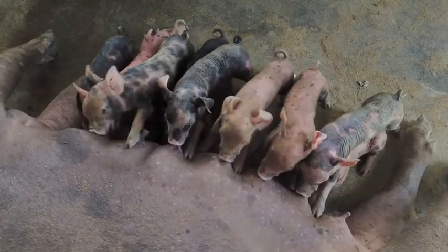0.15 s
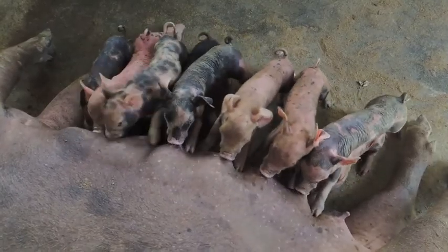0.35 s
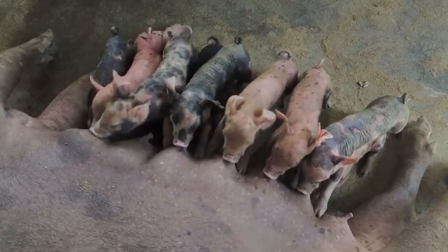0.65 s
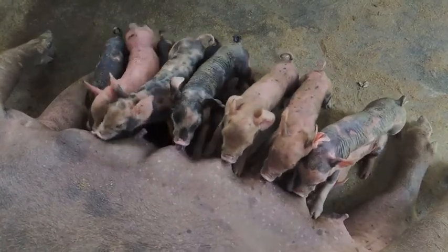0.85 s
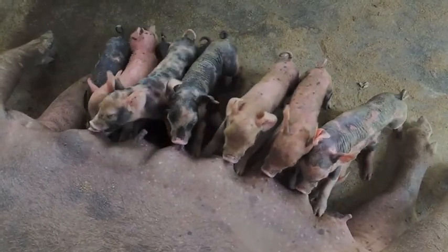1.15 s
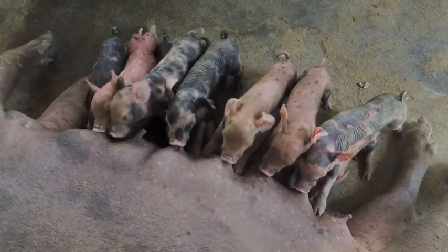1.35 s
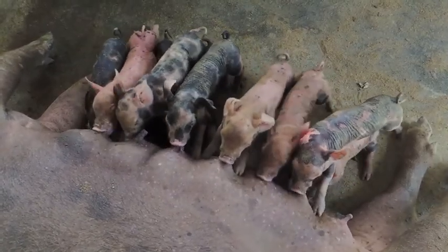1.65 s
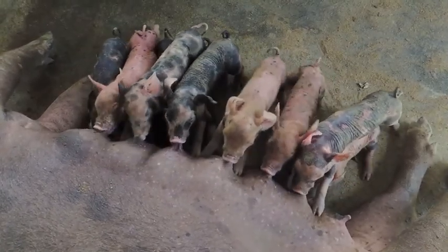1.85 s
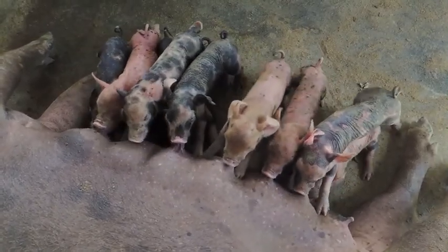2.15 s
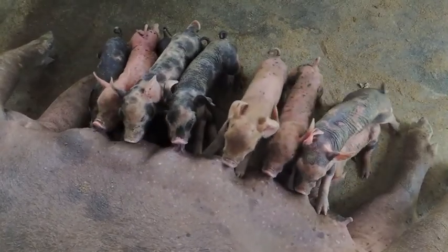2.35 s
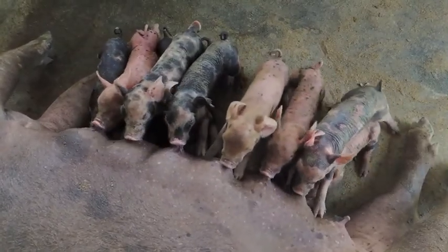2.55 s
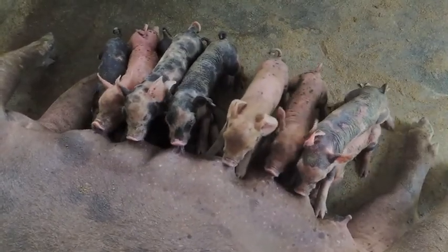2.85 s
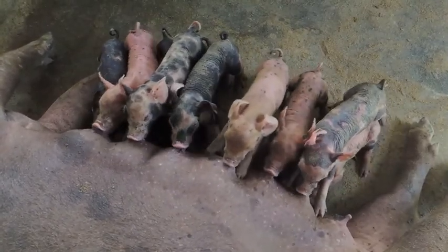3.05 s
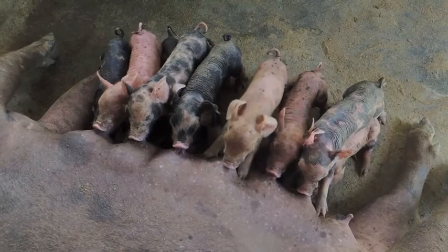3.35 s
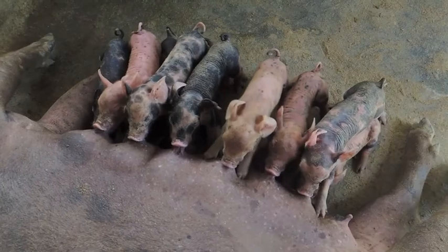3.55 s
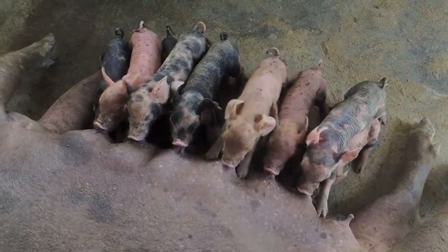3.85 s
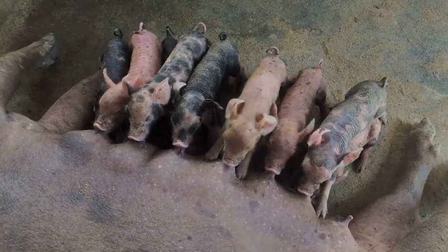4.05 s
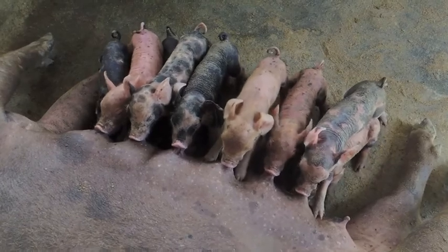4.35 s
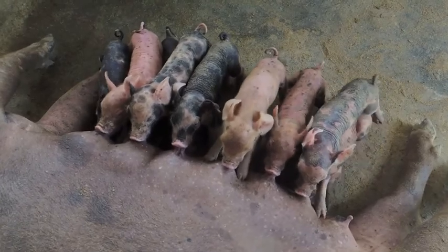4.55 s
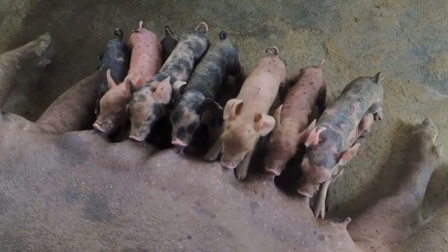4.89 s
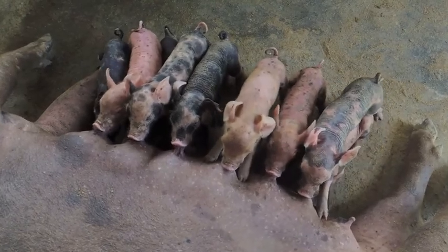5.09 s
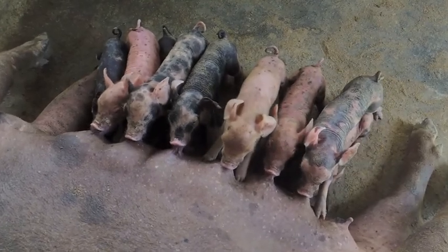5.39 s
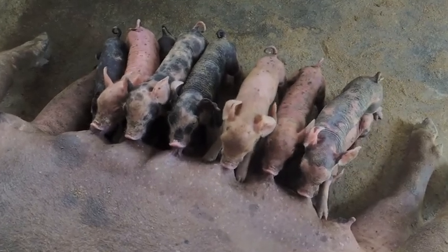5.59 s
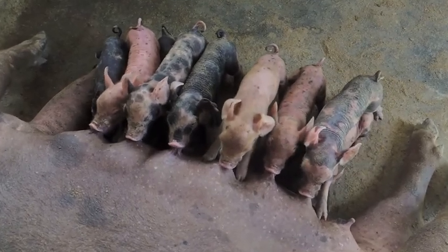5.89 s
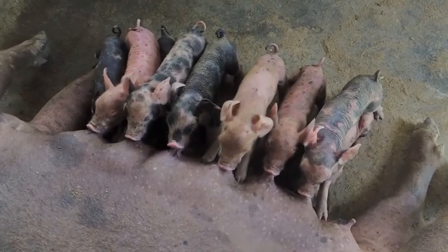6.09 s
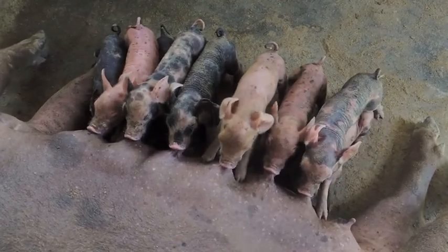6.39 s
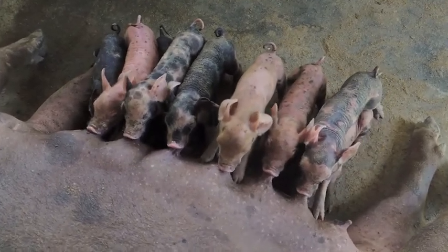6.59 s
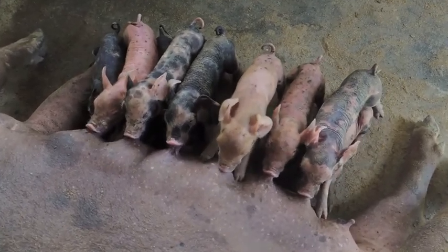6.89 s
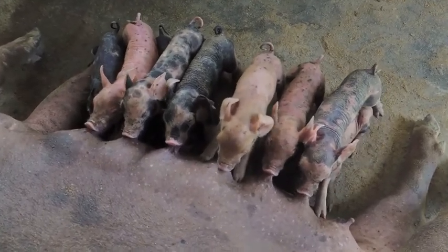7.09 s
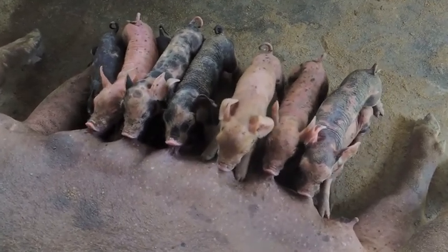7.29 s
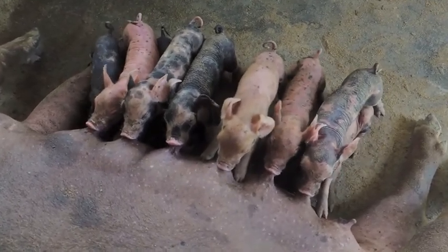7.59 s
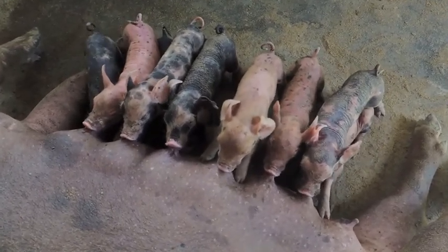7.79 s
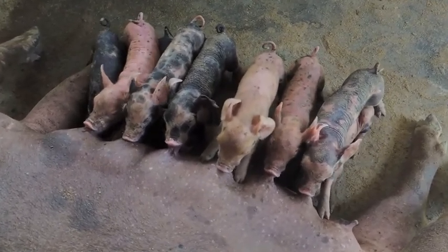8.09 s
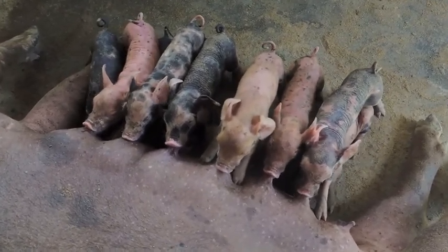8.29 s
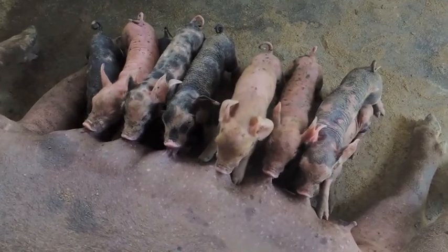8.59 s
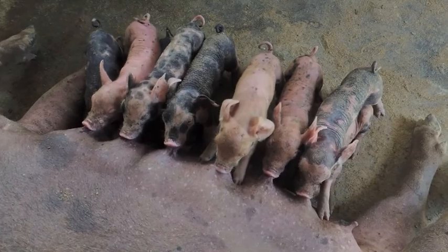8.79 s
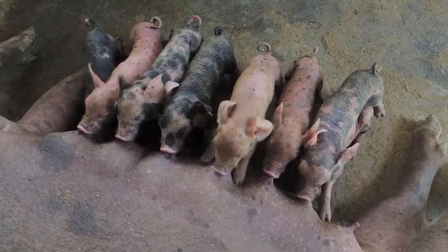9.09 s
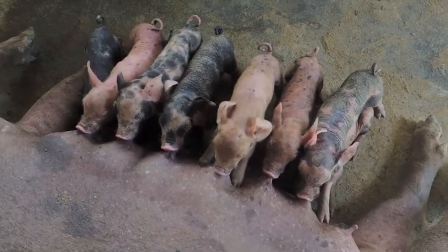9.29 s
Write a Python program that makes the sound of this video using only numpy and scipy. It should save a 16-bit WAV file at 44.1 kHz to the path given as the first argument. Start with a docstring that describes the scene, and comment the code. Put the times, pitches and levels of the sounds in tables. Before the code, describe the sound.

A sow gives short, low, rattling grunts in steady rhythm while piglets suckle with wet smacks and pops; one brief hoarse squeal early on.

```python
"""A sow on a concrete floor grunts in a steady rhythm, each grunt a few slow flaps ringing her throat. Her
piglets suckle: spit noise crackles into wet smacks, and tongues click sharply in mouths as click and ring.
Pulses through a few resonances make their whines and two breathy tails of the sow's grunts; a chopped, hoarse
whistle makes one squeal. Behind them lie faint wet ticks at random, the echo of floor and walls, and the dull
noise of the sty's air with a far insect hiss, a narrow band of noise."""
import sys
import numpy as np
from scipy import signal
from scipy.fft import rfft, irfft
from scipy.io import wavfile
from scipy.ndimage import uniform_filter1d

SR = 44100
rng = np.random.default_rng(int(sys.argv[2]) if len(sys.argv) > 2 else 0)


def digitize_waveform(pressure):
    """Quantize a signal to 16-bit integers and store it at the path in sys.argv[1].

    Rows of a 2-D input are taken as channels; values are limited to [-1, 1].
    """
    field = np.atleast_2d(pressure).T
    bounded = np.clip(field, -1, 1)
    quanta = np.round(bounded * 32767).astype(np.int16)
    wavfile.write(sys.argv[1], SR, quanta)


def voltage_ratio(level):
    """Linear amplitude factor for a level in decibels (scalar or array-like)."""
    return 10 ** (np.asarray(level, float) / 20)


N = 416304

# modes of the sow's throat and snout: f/Hz, t60/s, then relative level/dB at the first flap,
# in mid-grunt and at the last flap
THROAT_MODES = [(84, 0.033, 4, -10.5, 0.5), (161, 0.087, -3.5, -6, 0), (227, 0.03, -2, 1, -1.5),
                (418.1, 0.08, 3.5, 2.5, 2.5), (567, 0.038, -8, -0.5, -4.5), (637, 0.054, -10.5, -5.5, -7.5),
                (1036, 0.044, -1.5, -2.5, -3.5), (1473, 0.076, -10, 1, -36), (1819, 0.033, 3.5, -9, 6),
                (2228, 0.015, -3, -80, -62), (2394, 0.029, -6.5, 3.5, -36), (2776, 0.051, -10, -1, -19),
                (3250, 0.047, -8, -1.5, -14.5), (3610, 0.051, -9, -16, -3), (4314, 0.027, -18, -9, -2.5),
                (4820, 0.022, -9.5, -65, -20), (5213, 0.079, -10.5, -56, -37)]
OPENING = 260  # samples from the start of a flap's bulge to its slap


def evened(x):
    """Scales to rms 1."""
    return x / np.sqrt(np.mean(x ** 2) + 1e-20)


def read(points, hz):
    """Reads a table on a log-frequency axis."""
    f, value = np.transpose(points)
    return np.interp(np.log(hz + 1), np.log(f + 1), value)


def add(mix, s, sound):
    """Mixes a sound in at time s."""
    part = mix[..., round(s * SR):][..., :sound.shape[-1]]
    part += sound[..., :part.shape[-1]]


def resonate(x, hz, width_hz):
    """A fixed resonance of gain 1 at its peak."""
    return signal.lfilter(*signal.iirpeak(hz, hz / width_hz, SR), x)


def coloured(x, points):
    """Gives white noise the spectrum of a table, at rms 1."""
    hz = np.fft.rfftfreq(x.shape[-1], 1 / SR)
    return evened(irfft(rfft(x) * voltage_ratio(read(points, hz)), x.shape[-1]))


def flap(place, bright_db, chance):
    """One flap rings all modes of the throat; their balance shifts with its place in the grunt (0-1)."""
    t, ring = np.arange(6000) / SR, 0
    for k, ((hz, t60, *db), (detune, lift)) in enumerate(zip(THROAT_MODES, chance)):
        mode_db = np.interp(place, [0, .5, 1], db) + 2 * lift + bright_db * (hz > 1300)
        tone = np.sin(2 * np.pi * hz * (1 + 0.026 * detune) * t)
        ring = ring + (-1) ** k * voltage_ratio(mode_db - 60 * t / t60) * tone  # neighbours have opposite sign
    after = np.arange(4000)
    rush = np.exp(-after / 300) + voltage_ratio(-9) * np.exp(-after / 1500)  # air rushes out, breath lingers
    air = rng.standard_normal((2, 4000)) * rush
    thinned = air[0] - 0.46 * uniform_filter1d(air[0], 30)  # turbulence is thin in the bass
    strike = 0.87 * thinned / np.sqrt(300)
    slap = np.hanning(round(np.interp(place, [0, 1], [5, 22])) + 2)  # tiring flaps close more softly
    add(strike, 0, -slap / slap.sum())
    bulge = np.hanning(OPENING)  # the tissue bulges slowly before it slaps shut
    sound = signal.fftconvolve(ring, np.append(0.5 * bulge / bulge.sum(), strike))
    rasp = resonate(resonate(air[1], 4200, 1470), 4200, 1470)  # breath scrapes broadly past the palate
    add(sound, OPENING / SR, voltage_ratio(bright_db - 2) * rasp)
    return sound


def sow():
    """A soft dull catch, then slow flaps that swell, sink and grow duller, over a sigh of breath."""
    # grunts: first full flap t/s, last flap t/s, number of flaps
    grunts = [(.432, .543, 5), (.876, .958, 4), (1.543, 1.655, 5), (2.048, 2.13, 4), (2.51, 2.594, 4),
              (3.162, 3.248, 4), (3.714, 3.795, 4), (4.363, 4.448, 4), (4.928, 5.001, 4), (5.465, 5.556, 4),
              (5.985, 6.074, 4), (6.637, 6.742, 5), (7.132, 7.217, 4), (7.655, 7.747, 5), (8.309, 8.394, 4),
              (8.939, 9.025, 4)]
    # each grunt's effort: level/dB, first flap relative to the peak/dB, place of the peak (0-1),
    # brightness after the first flap/dB
    effort = [(-20, -11, 0.75, 4), (-19, -13.5, 0.44, -4.5), (-21.5, -5.5, 0.17, -7),
              (-17.5, -21, 0.38, -1.5), (-18.5, -9.5, 0.96, -5), (-22.5, -7, .66, 0),
              (-20.5, -8.5, 0.59, -1.5), (-22, -6, 0.45, 2), (-22, -7, 0.7, 2.5), (-19.5, -12, 0.9, 1.5),
              (-22, -11.5, .66, 5.5), (-22, -9, 0.85, 4.5), (-21.5, -7.5, 1, -2.5), (-22.5, -7, .7, -1.5),
              (-22.5, -6.5, 0.7, 3), (-23, -8.5, 0.47, -3)]
    catch_s, catch_db = .038, -39.5  # lead of the catch; its gain
    last_db, dulling_db = -5.5, -9.5  # last flap under the peak; treble change reached by the last flap
    sigh_db, sigh_t60 = -24.5, 0.24  # sigh under the effort; its decay in s
    out, t = np.zeros(N), np.arange(20000) / SR
    for (s, last_s, count), (effort_db, first_db, peak, bright_db) in zip(grunts, effort):
        chance = rng.standard_normal((6, len(THROAT_MODES), 2))
        catch = flap(1, -28, chance[-1])
        add(out, s - catch_s - OPENING / SR, voltage_ratio(catch_db) * catch)
        length = last_s - s
        breath = evened(resonate(rng.standard_normal(len(t)), 1020, 2800))
        fade_db = -60 * np.maximum(t - length, 0) / sigh_t60
        # breath builds through the grunt and sighs out after it
        add(out, s, breath * np.minimum(t / length, 1) * voltage_ratio(effort_db + sigh_db + fade_db))
        for k in range(count):
            place = k / (count - 1)
            sound = flap(place, (k > 0) * (bright_db + dulling_db * place), chance[k])
            swell_db = np.interp(place, [0, min(peak, .95), 1], [first_db, 0, last_db])
            add(out, s + place * length - OPENING / SR, voltage_ratio(effort_db + swell_db) * sound)
    # keeps the grunts free of rumble below 70 Hz
    return signal.sosfilt(signal.butter(2, 70, "high", fs=SR, output="sos"), out)


def smacks():
    """Spit at the teats crackles up to one loud tick and fizzes away, a bright part over a dull one."""
    # smacks: loud tick t/s, bright part level/dB, dull part level/dB, both before the envelope
    moments = [(0.0644, -37, -40), (0.133, -42, -58), (0.399, -41, -51), (.6075, -30, -65),
               (0.9317, -38, -57), (1.047, -38, -47), (1.5107, -28, -54), (1.752, -35, -63),
               (1.96, -35, -65), (2.1902, -31, -60), (2.258, -42, -48), (2.353, -43, -48.5),
               (2.436, -31.5, -54), (2.664, -33.5, -52), (2.903, -34.5, -61), (3.15, -36.5, -47.5),
               (3.395, -34.5, -66), (3.645, -35, -50), (3.89, -44, -58), (4.14, -46, -50),
               (4.3744, -35, -47), (4.6307, -38, -53), (4.876, -38, -68), (5.1203, -33, -70),
               (5.361, -36, -57), (5.528, -43.5, -39.5), (5.624, -37, -61), (5.8495, -38, -50),
               (6.054, -41, -38), (6.109, -32.5, -56), (6.249, -42, -51.5), (6.366, -35, -56),
               (6.433, -45, -53), (6.6104, -34, -45), (6.846, -35, -52), (7.1078, -34.5, -52),
               (7.1916, -37, -44), (7.263, -46, -57), (7.35, -66, -47), (0.858, -51, -48),
               (7.5625, -33, -49), (7.8294, -39, -59), (7.9196, -36, -45), (8.069, -37, -51),
               (8.316, -39, -43), (8.577, -37, -58), (8.842, -33, -46), (8.916, -44, -60),
               (9.0818, -45, -62), (9.315, -42, -68)]
    # spectrum of the bright part: f/Hz, relative level/dB per Hz
    spectrum = [(3530, -53), (6000, -9.5), (6970, -11.5), (8380, -3), (9430, -2), (12200, 3), (14100, -11),
                (15000, -48)]
    out, t = np.zeros((2, N)), np.arange(-900, 3500) / SR
    crackle = .6 * np.clip(2 + 2 * t / 0.011, 0, 1)  # begins 11 ms ahead of the tick
    fizz = .5 * voltage_ratio(-60 * t / .15) + voltage_ratio(-60 * abs(t) / .016)  # slow fizz plus the short tick
    shape = np.where(t < 0, crackle, fizz)
    for s, bright_db, dull_db in moments:
        left, other, dull, draw, size = rng.standard_normal((5, len(t)))
        bright = np.array([left, 1.2 * left + 0.6 * other])  # short waves differ from left to right
        bubbles = (draw > 2.4) * (0.14 + abs(size))
        grain = np.convolve(bubbles, np.hanning(50), "same") + 0.75
        ring_hz = 12400 * (1 + 0.11 * rng.standard_normal())
        hollow = bright + 1.6 * resonate(bright, ring_hz, 1800)  # the gap between lip and teat rings
        spit = voltage_ratio(bright_db) * coloured(hollow, spectrum)
        spit = spit + voltage_ratio(dull_db) * evened(resonate(dull, 3640, 4000))
        add(out, s + t[0], spit * grain * shape)
    return out


def pops():
    """A tongue clicks in a mouth: a sharp click, two short rings of the mouth and a fizz."""
    # pops: t/s, level/dB, low ring f/Hz, high ring f/Hz, t60 of the driving noise/s
    moments = [(1.09, -12, 2780, 13300, 0.036), (2.0249, -21, 4470, 10000, 0.034),
               (3.056, -31, 1100, 10600, 0.063), (5.2987, -28.5, 3580, 13500, 0.035),
               (5.825, -33.5, 3460, 10200, 0.054), (5.885, -29.5, 1040, 7460, 0.02),
               (6.56, -31, 1130, 12200, 0.038), (7.0203, -25, 990, 11100, 0.12),
               (8.6612, -22.5, 1340, 6540, 0.091)]
    out, t = np.zeros(N), np.arange(3000) / SR
    for s, level_db, low_hz, high_hz, t60 in moments:
        burst = rng.standard_normal(len(t)) * voltage_ratio(-60 * t / t60)
        click = np.sin(2 * np.pi * 5000 * t) * np.exp(-t / 0.000089)
        rings = 1.2 * resonate(burst, low_hz, 330) + 1.36 * resonate(burst, high_hz, 1170)
        add(out, s, voltage_ratio(level_db) * (click + rings + 0.26 * burst))
    return out


def voiced(length, db, hz, bright_db):
    """Unsteady pulses and breath noise drive the resonances of a snout."""
    # resonances of a piglet's snout, used for every call: f/Hz, width/Hz, relative level/dB
    snout = [(607, 570, 25.5), (1700, 480, 11.5), (3430, 740, 7), (6640, 2400, 3)]
    size = round(length * SR)
    wobble = 1 + .6 * uniform_filter1d(rng.standard_normal(8000), 90)[:size]
    climb = 1 + .12 * np.linspace(-.5, .5, size)  # the pitch rises through the call
    turns = np.cumsum(hz * climb * wobble) / SR
    pulses = np.diff(np.floor(turns), prepend=0)
    drive = evened(pulses) + .35 * rng.standard_normal(8000)[:size]
    voice = 0
    for f, width, gain_db in snout:
        formant = resonate(resonate(drive, f, width), f, width)
        voice = voice + voltage_ratio(gain_db + bright_db * (f > 1000)) * formant
    return voltage_ratio(db) * evened(voice) * np.sqrt(np.hanning(size))


def whines_and_tails():
    """Short whines of the piglets, and two breathy tails of the sow's grunts at 1.659 and 5.022 s."""
    # calls: t/s, length/s, level before the fades/dB, mid pitch f/Hz, brightness above 1 kHz/dB
    calls = [(0.186, 0.1, -45, 560, 4), (0.297, .04, -31.5, 1720, 7.5), (0.71, 0.037, -40.5, 599, 6),
             (0.928, .1, -38.5, 81.4, 16), (0.973, .056, -33, 3900, 32), (1.192, 0.15, -39, 458, 8),
             (1.659, 0.082, -38, 291.5, 9), (1.735, 0.04, -35, 600, 41), (2.716, 0.18, -44, 213, 6),
             (2.795, 0.047, -42.5, 750, 9), (4.786, 0.075, -47.5, 663, -20),
             (5.022, 0.053, -36.5, 288, -16), (6.195, 0.079, -49, 1126, -15), (6.518, .07, -51, 690, -16),
             (7.44, .17, -54, 1310, -13)]
    out = np.zeros(N)
    for s, *call in calls:
        add(out, s, voiced(*call))
    return out


def squeal():
    """An arching whistle with overtones; a slower vibration chops it and breath makes it hoarse."""
    # course of the squeal: t/s, relative level/dB, pitch f/Hz, roughness (0-1), share of the octave (0-1)
    course = [(1.235, -32, 2255, 0.1, 0), (1.248, -37, 2800, 0.5, 0.88), (1.272, -19.5, 3250, 0.72, 0.85),
              (1.294, -20, 3480, 0.64, 0.8), (1.306, -20.5, 3700, 0.25, 0.52),
              (1.332, -29, 3840, 0.14, 0.6), (1.359, -24, 3680, 0.02, 0.4), (1.379, -27, 3300, 0, 0.74),
              (1.396, -48, 1740, 0.2, 0)]
    s, *columns = np.transpose(course)
    t = np.arange(s[0], s[-1], 1 / SR)
    db, hz, rough, octave = (np.interp(t, s, np.array(c)) for c in columns)
    shake = evened(uniform_filter1d(rng.standard_normal(9000), 40))[:len(t)]
    turn = 2 * np.pi * np.cumsum(hz * (1 + (.012 + .08 * rough) * shake)) / SR
    upper = rough * (.2 * np.sin(3 * turn) + .45 * np.sin(4 * turn))
    tone = (1 - octave) * np.sin(turn) + octave * (np.sin(2 * turn) + upper)
    chop = 1 + 0.37 * rough * np.cos(2 * np.pi * 420 * t + 2.8 * shake)
    hoarse = 0.32 * rough * rng.standard_normal(9000)[:len(t)]
    mouth = resonate((tone + hoarse) * chop, 4110, 260)  # the mouth favours one band
    voice = 0.55 * tone * chop + 1.6 * mouth
    return s[0], voltage_ratio(db) * 2 * voice * signal.windows.tukey(len(t), .1)


def walls(x):
    """Sparse taps of random sign off floor and walls, each band dying at its own speed."""
    # decay of the echo: f/Hz, t60/s
    decay = [(150, 0.078), (1000, 0.21), (4000, 0.099), (12000, 0.061)]
    taps = np.zeros((2, SR // 2))
    at = np.arange(160, SR // 2 - 20, 20)
    sign = rng.choice([-1., 1.], (2, len(at)))
    taps[[[0], [1]], at + rng.integers(0, 20, (2, len(at)))] = sign
    hz, t, z = signal.stft(taps, SR, nperseg=256)
    # long waves reach left and right alike
    z[1] = z[1] + (z[0] - z[1]) / (1 + (hz[:, None] / 2500) ** 2)
    tail = signal.istft(z * voltage_ratio(-60 * t / read(decay, hz)[:, None]), SR, nperseg=256)[1]
    return signal.fftconvolve(x[None], tail / np.linalg.norm(tail[0]), axes=1)[:, :N]


def ticks():
    """Faint wet ticks scattered at random, left and right: short decaying bursts of noise."""
    hit = rng.random((2, N)) < 60 / SR  # 60 a second on each side
    size = voltage_ratio(7 * np.minimum(rng.exponential(1, (2, N)), 4)) * hit
    tick = rng.standard_normal(400) * np.exp(-np.arange(400) / 70)
    clicks = signal.oaconvolve(size, tick[None], axes=1)[:, :N]
    return voltage_ratio(-59) * evened(resonate(clicks, 5600, 6000))


def sty():
    """Shaped noise: lumpy air whose lows and treble drift in level, and a narrow insect band."""
    # spectrum of the air: f/Hz, relative level/dB per Hz
    spectrum = [(12, -32), (20, 10.5), (72, 1), (457, -6), (841, -6), (2160, -13), (5690, -15.5),
                (7300, -14), (7930, -16.5), (8860, -12.5), (11700, -11.5), (13800, -14), (15000, -64)]
    # drift: t/s, low air level/dB, treble level/dB (both taken about their mean), insect level/dB
    drift = [(0.0, -46.5, -38.5, -51), (0.31, -50.5, -38, -63), (1.21, -47, -34.5, -61),
             (1.5, -50, -40.5, -69), (4.07, -50, -46.5, -54.5), (4.78, -49.5, -42, -60),
             (5.89, -49, -46, -56), (8.75, -50.5, -42, -56.5), (9.44, -50.5, -44.5, -52)]
    # left-right likeness: f/Hz, share (0-1)
    likeness = [(30, 1), (100, 0.73), (1000, 0.65), (4000, 0.82), (8000, 0.26), (14000, 0.055)]
    frames, hz = N // 256 + 5, np.fft.rfftfreq(1024, 1 / SR)[:, None]
    a, b, c, d, patches = rng.standard_normal((frames, 513, 5)).T
    patches = evened(uniform_filter1d(uniform_filter1d(patches, 10, 0), 12, 1))
    s, *columns = np.transpose(drift)
    frame_s = (np.arange(frames) - 2) * 256 / SR
    low_db, high_db, insect_db = (np.interp(frame_s, s, column) for column in columns)
    low = 1 / (1 + (hz / 4000) ** 4)
    swing_db = low * (hz > 120) * (low_db - low_db.mean()) + (1 - low) * (high_db - high_db.mean())
    air = voltage_ratio(read(spectrum, hz) + swing_db + 1.6 * patches)
    air *= voltage_ratio(-43.5) / np.sqrt(np.mean(air ** 2))
    band = np.exp(-((hz - 8050) / 330) ** 2)
    insect = voltage_ratio(insect_db) * band / np.sqrt(np.mean(band ** 2))
    same, left = np.clip(read(likeness, hz), -1, 1), a + 1j * b
    right = same * left + np.sqrt(1 - same ** 2) * (c + 1j * d)
    z = np.array([left, right]) * np.hypot(air, insect)
    unit = np.std(signal.istft(left, nperseg=1024, noverlap=768)[1])  # level of the bare noise
    return signal.istft(z, nperseg=1024, noverlap=768)[1][:, :N] / unit


def scene():
    """The animals close by, their echo, and the sty."""
    voices = sow() + pops() + whines_and_tails()
    add(voices, *squeal())
    wet = smacks()
    echo = voltage_ratio(-8) * walls(voices) + voltage_ratio(6.5) * walls(wet.mean(0))
    return voices + wet + echo + sty() + ticks()


def top_cut(x):
    """Nothing passes above the cut-off."""
    return signal.sosfilt(signal.butter(12, 15230, fs=SR, output="sos"), x)


def record(dry):
    """The treble leans to the right and the top of the band is cut steeply."""
    hz = np.fft.rfftfreq(N, 1 / SR)
    lean_db = 1.0 / (1 + (6500 / (hz + 1)) ** 4) * np.array([[-1], [1]])
    edge_db = -np.clip((hz - 14250) / 25, 0, 45)  # falls 1 dB every 25 Hz, down to -45 dB
    mix = irfft(rfft(dry) * voltage_ratio(lean_db + edge_db), N)
    return top_cut(mix)


dry = scene()
out = record(dry)
digitize_waveform(out)
```